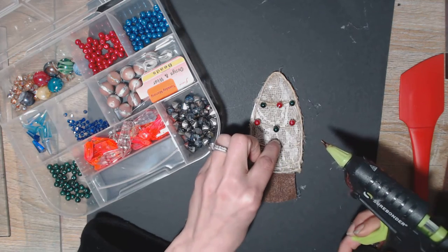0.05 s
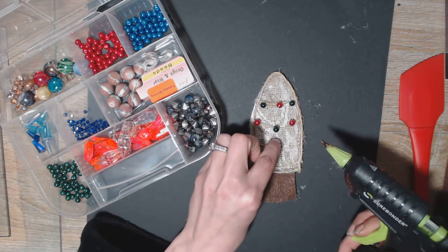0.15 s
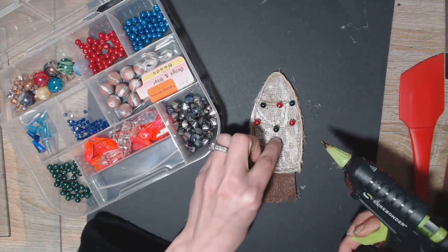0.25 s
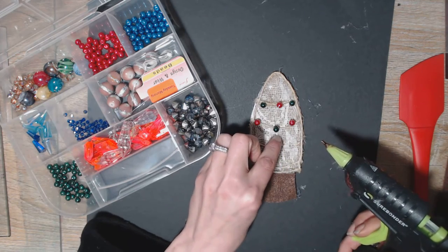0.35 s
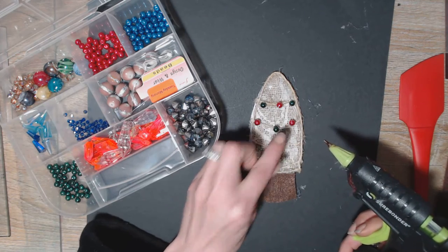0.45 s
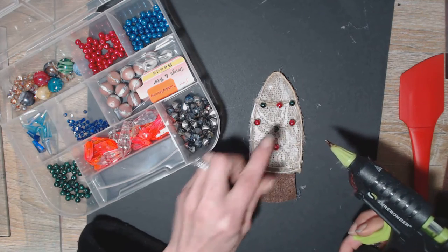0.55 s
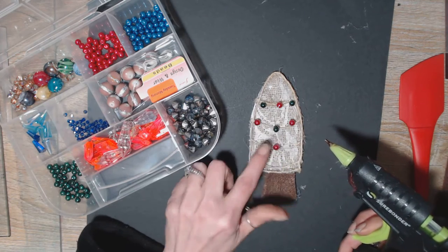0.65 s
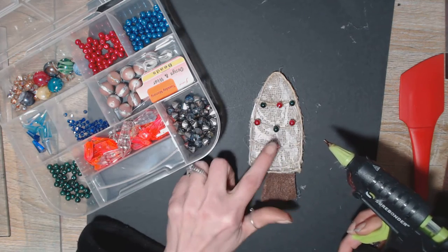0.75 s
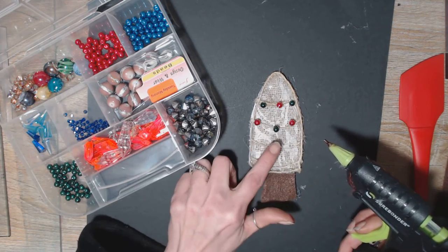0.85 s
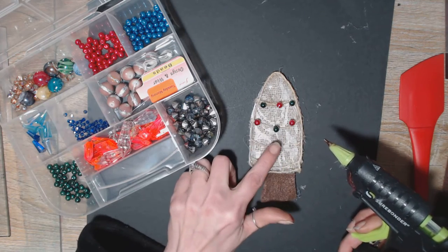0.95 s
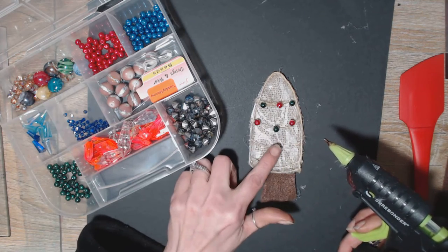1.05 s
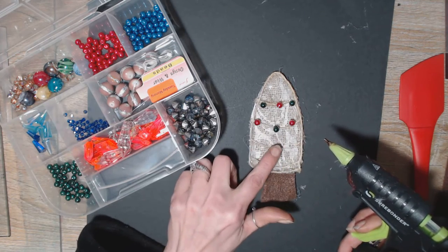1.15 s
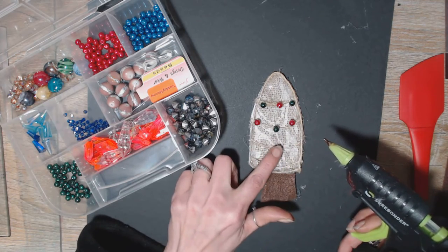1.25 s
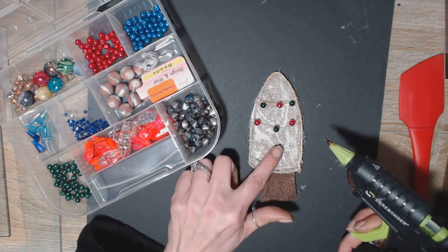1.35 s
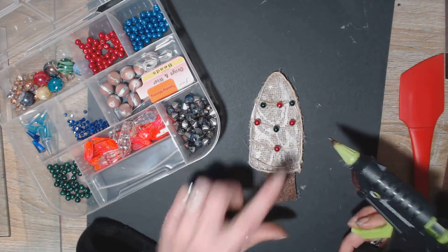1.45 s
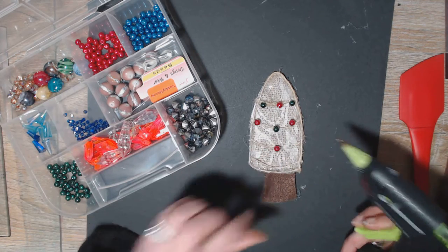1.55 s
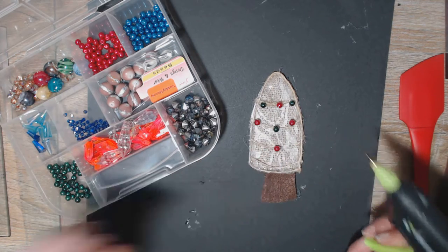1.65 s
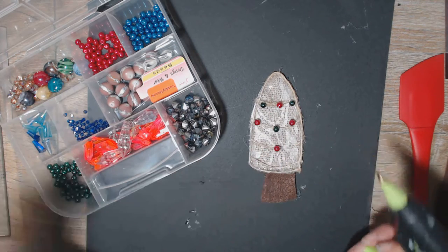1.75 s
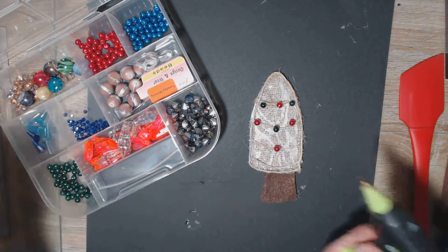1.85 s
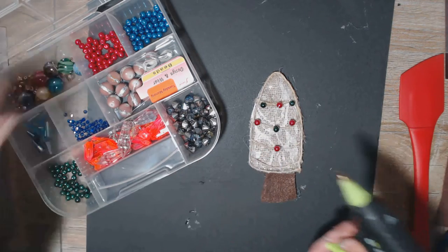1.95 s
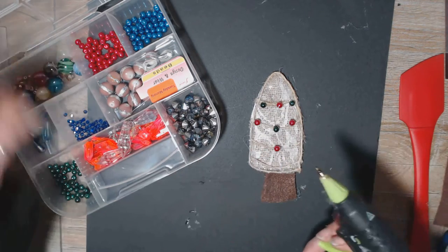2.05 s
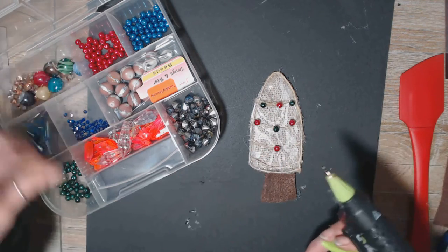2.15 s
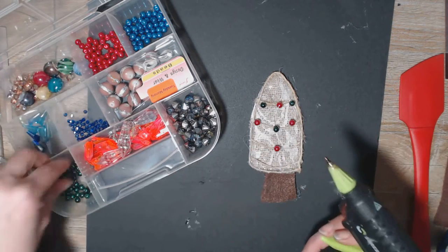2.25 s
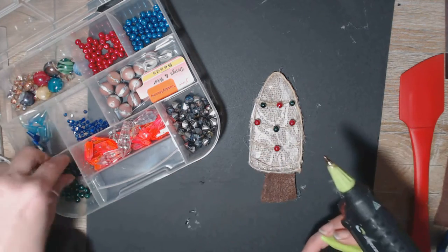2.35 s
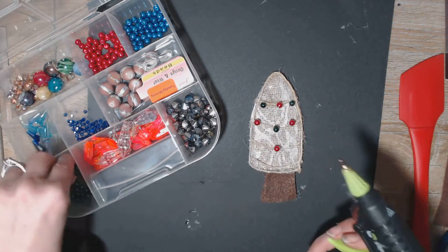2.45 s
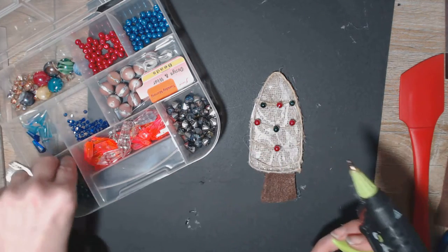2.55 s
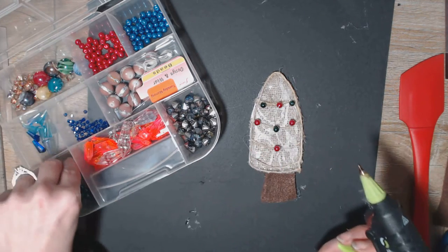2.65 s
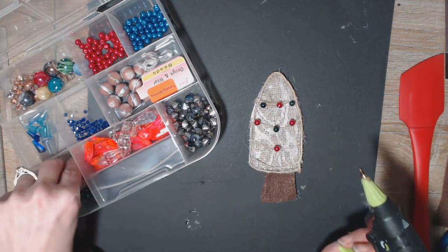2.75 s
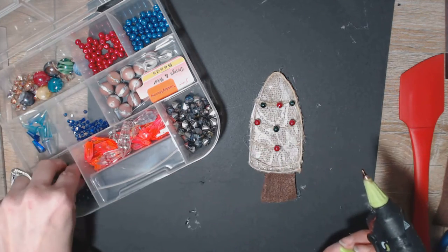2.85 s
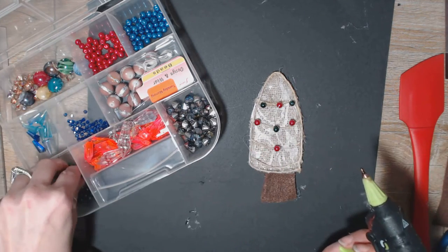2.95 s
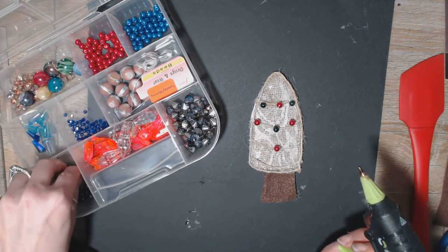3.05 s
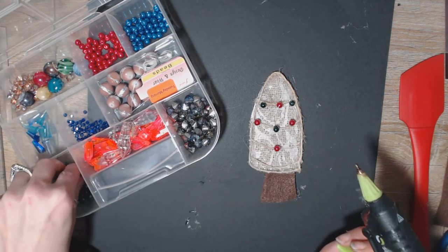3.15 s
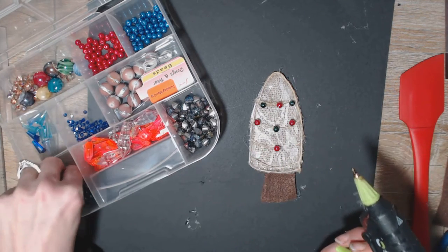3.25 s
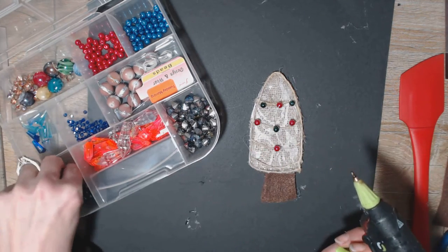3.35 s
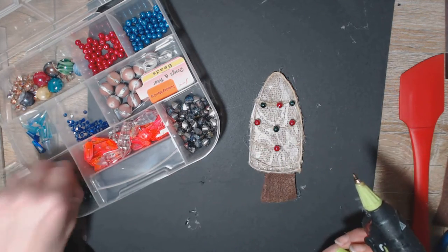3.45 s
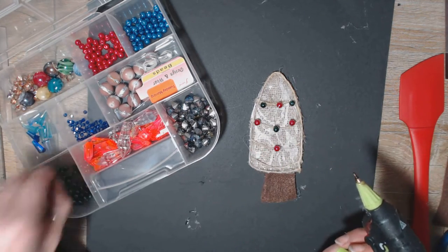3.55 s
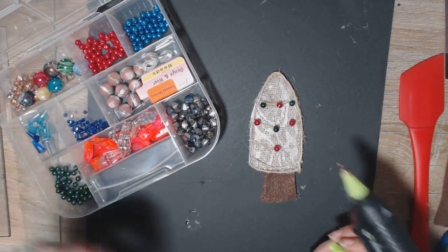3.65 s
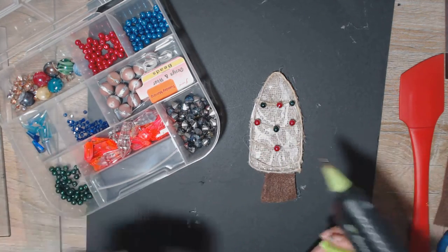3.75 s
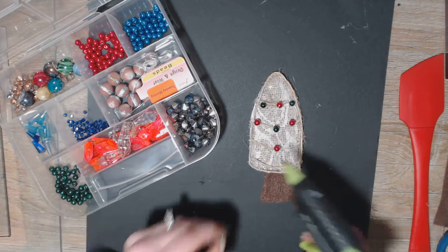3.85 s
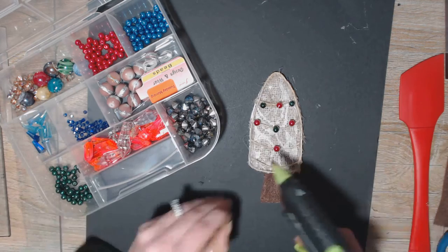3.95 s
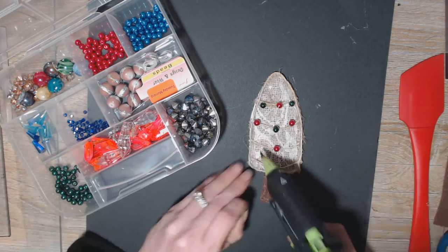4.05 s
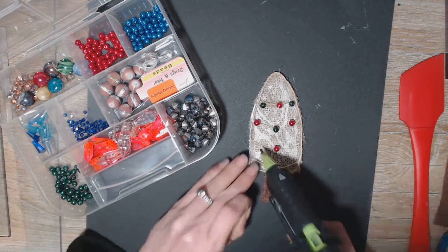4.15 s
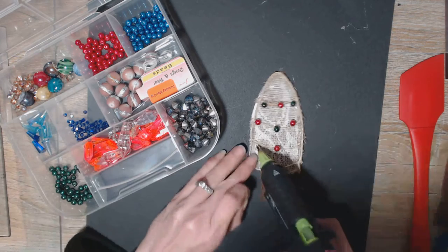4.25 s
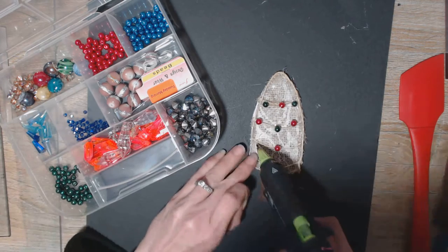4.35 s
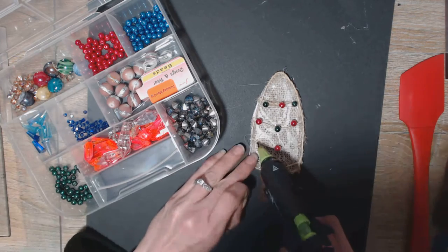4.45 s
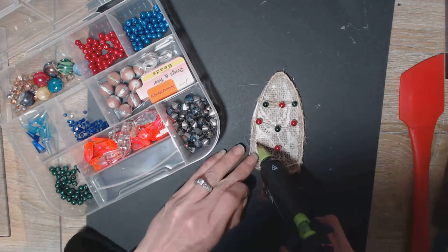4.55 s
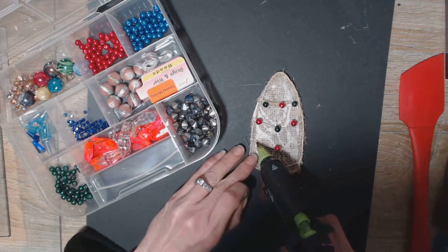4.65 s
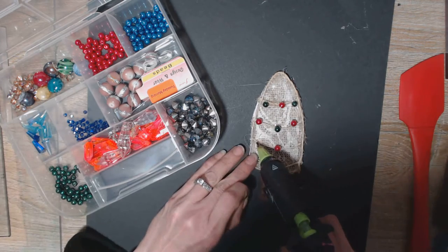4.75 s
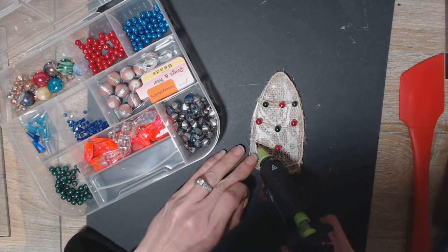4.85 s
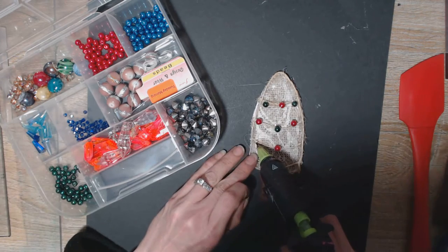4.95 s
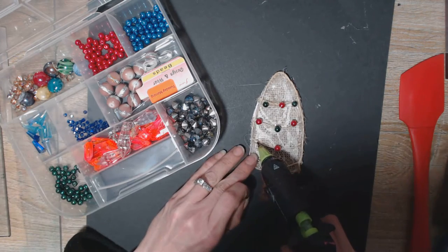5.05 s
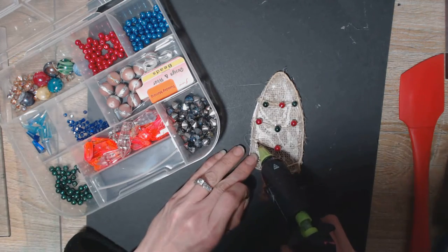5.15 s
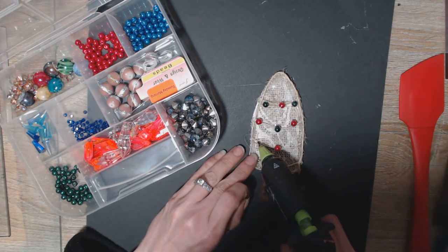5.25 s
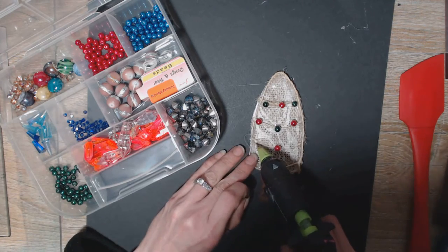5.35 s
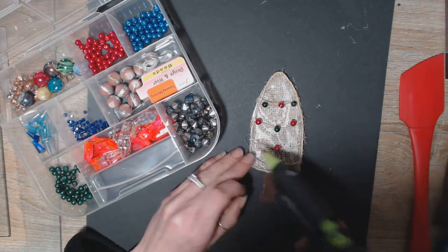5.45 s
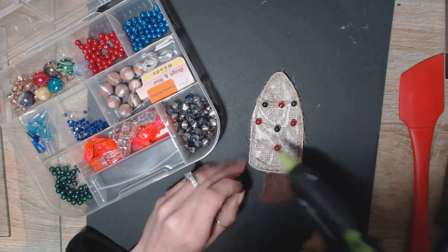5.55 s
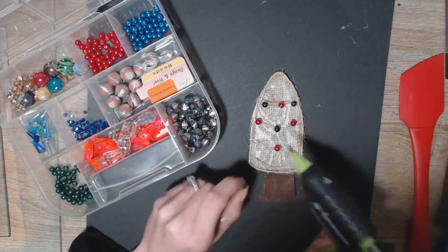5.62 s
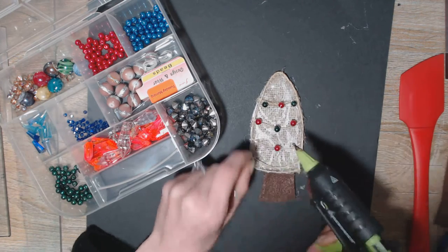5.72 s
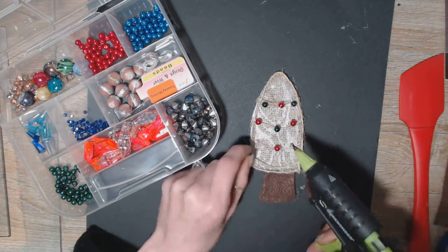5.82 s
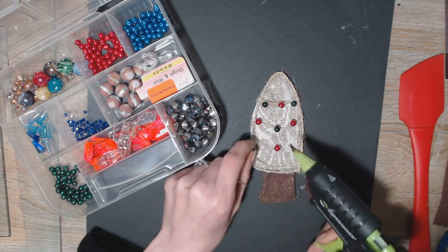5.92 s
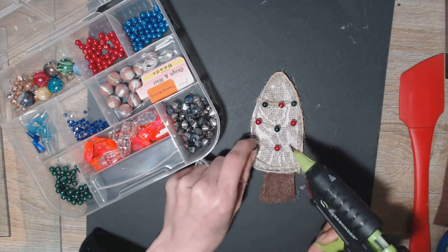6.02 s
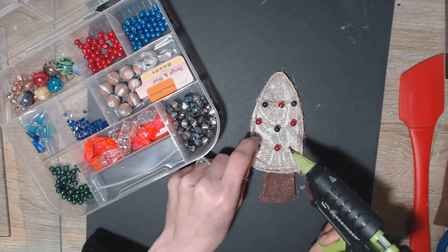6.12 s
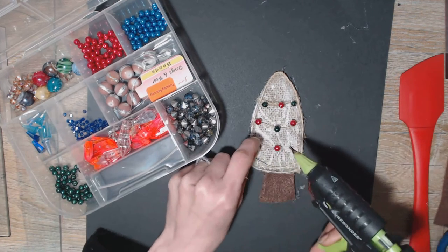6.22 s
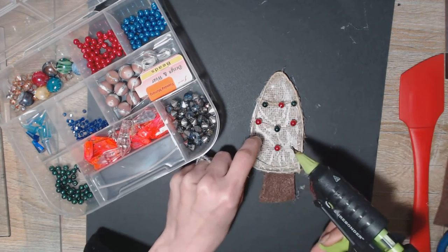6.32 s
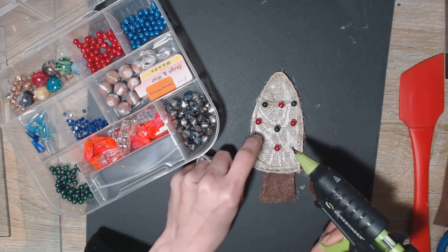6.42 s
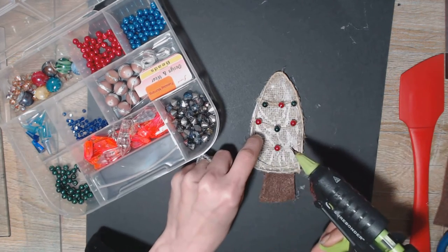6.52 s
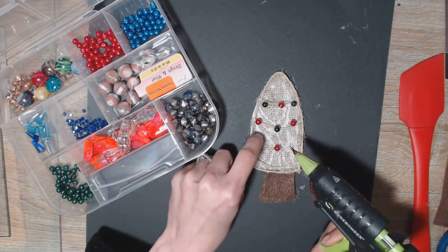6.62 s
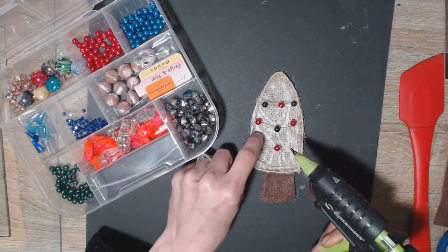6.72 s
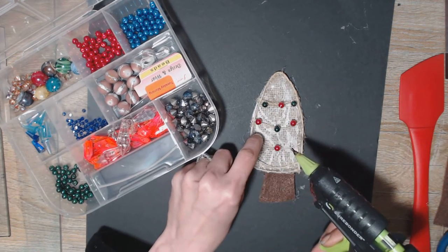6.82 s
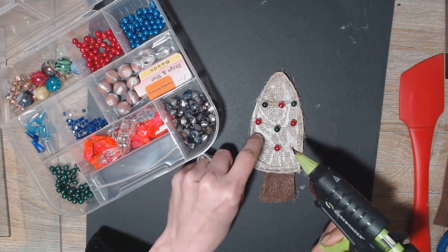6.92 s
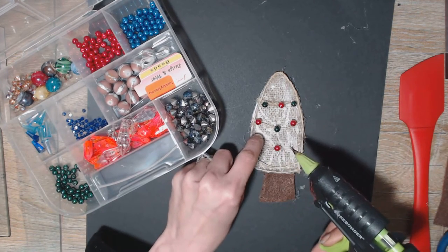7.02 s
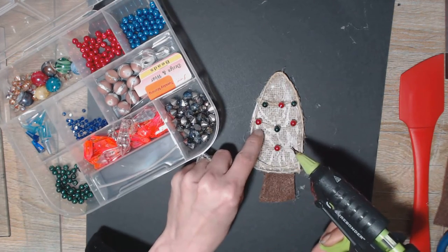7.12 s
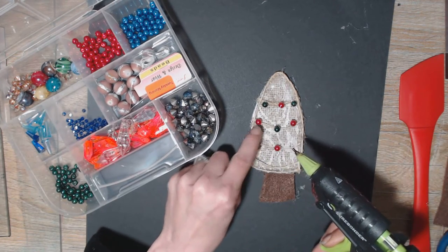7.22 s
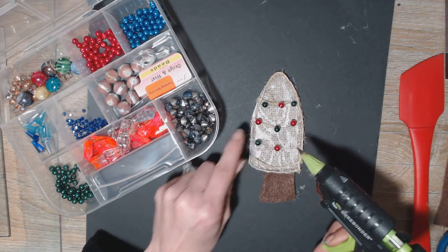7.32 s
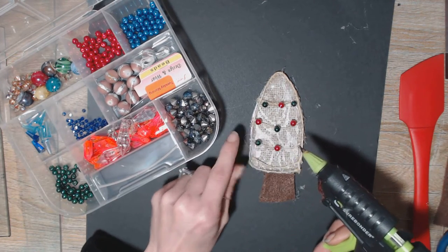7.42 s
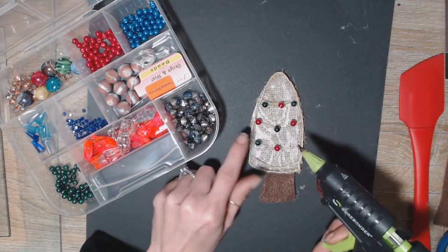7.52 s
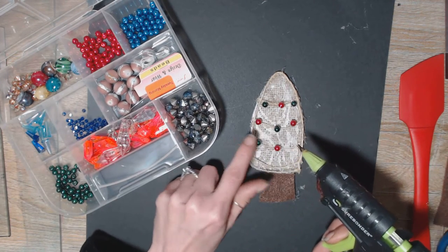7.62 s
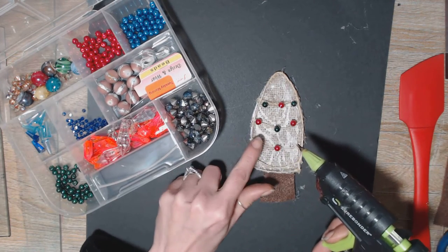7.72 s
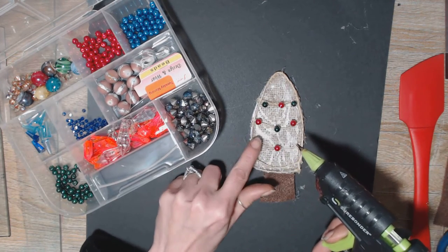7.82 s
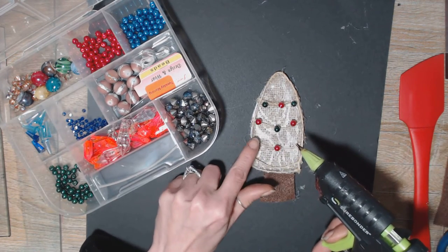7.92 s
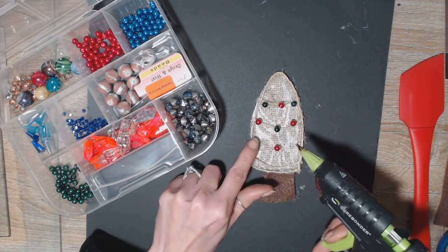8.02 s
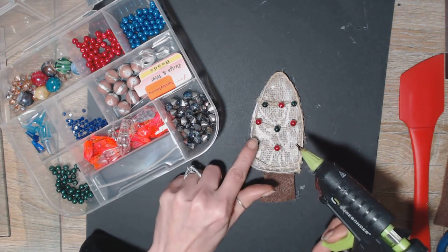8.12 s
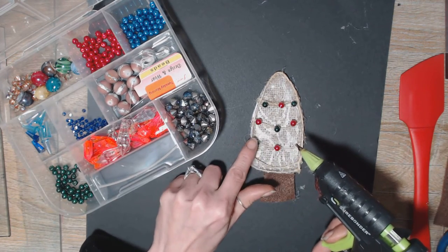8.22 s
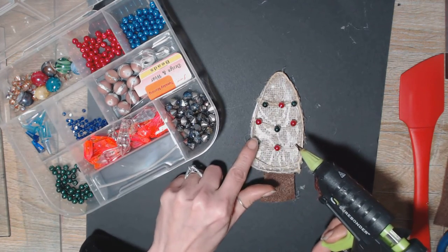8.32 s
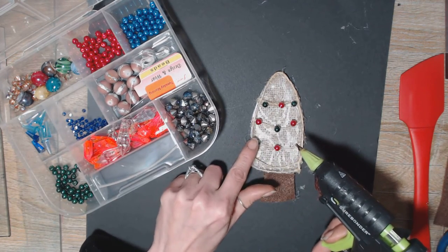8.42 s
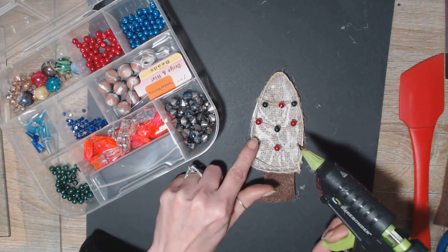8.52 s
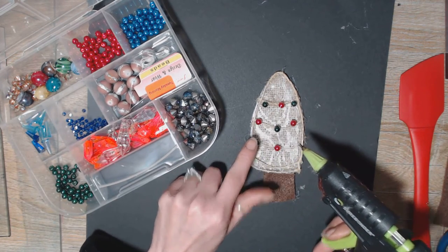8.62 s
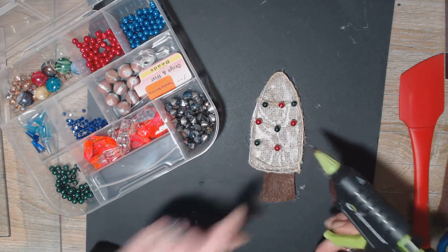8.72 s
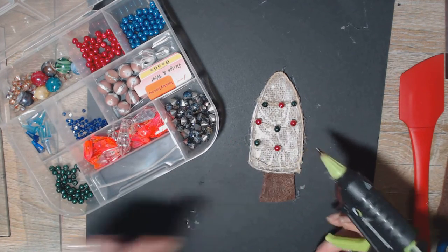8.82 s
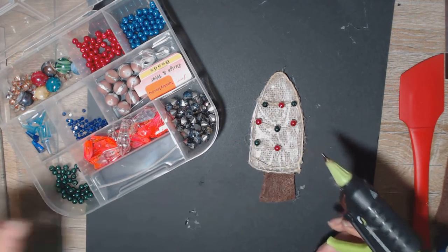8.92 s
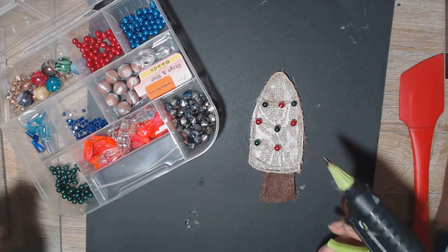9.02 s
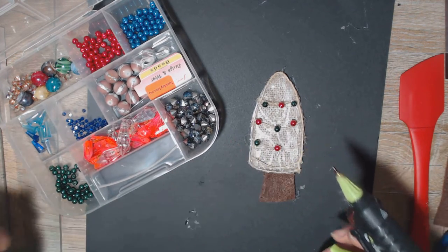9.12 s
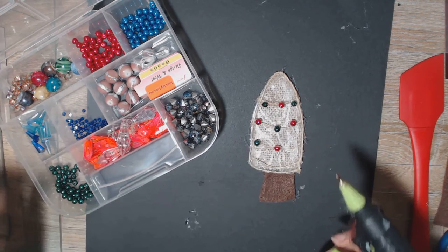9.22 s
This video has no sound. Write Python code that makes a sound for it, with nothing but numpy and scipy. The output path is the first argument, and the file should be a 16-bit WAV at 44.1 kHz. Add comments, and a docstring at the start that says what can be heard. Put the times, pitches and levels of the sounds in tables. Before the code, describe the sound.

A steady low mains hum fills a quiet room, with faint hiss and a tiny, rapid motor whine. Fingers tap a small craft piece once, then rummage in a plastic bead box for about a second with bright, dense rattling and clicks. Near silence follows, broken by a short scrape and tool click, and much later a light tick on the rim. Close, slightly dull microphone.

```python
"""A strong mains hum, a faint hiss and a camera motor stepping 15 times a second sound throughout.
Soon fingers tap the mat and the work; then they rummage for small beads in a plastic compartment box,
with later touches of the mat, a tool and the rim. Hum and whine are sums of sines, hiss is shaped noise;
taps are impulses with chatter and tail, rubs and rolling beads are random contacts, and both ring
the resonances of the box. Thuds and table knocks are damped sines. A narrow-band microphone hears all."""
import sys
import numpy as np
from scipy import signal
from scipy.fft import rfft, irfft, next_fast_len
from scipy.io import wavfile
from scipy.ndimage import uniform_filter1d

SR = 44100
rng = np.random.default_rng(int(sys.argv[2]) if len(sys.argv) > 2 else 0)


def materialize(psi):
    """Save the field psi as 16-bit PCM at rate SR to the path in sys.argv[1].

    A 1-D psi becomes a single channel; in a 2-D psi each row is a channel.
    """
    bounded = np.clip(np.atleast_2d(psi).T, -1, 1)
    quanta = np.round(bounded * 32767).astype(np.int16)
    wavfile.write(sys.argv[1], SR, quanta)


N = 408807

# resonances of the plastic box: f/Hz, width/Hz, level/dB
BOX_MODES = [(256.9, 61, -3), (630, 120, -11.5), (777.4, 40, -2.5), (783, 56, 1), (940.5, 120, -0.5),
             (1085, 110, -0.5), (1330, 300, -3.5), (1680, 120, -2.5), (1972, 170, -4.5), (2260, 65, -4.5),
             (2500, 270, -8), (3050, 140, -5.5), (3258, 150, -5.5), (3556, 180, -4), (3794, 420, -8),
             (4190, 240, -4.5), (4384, 250, -6.5), (4948, 380, -2.5), (5020, 200, 0), (5520, 420, -6),
             (5883, 550, -5), (6244, 360, -3.5), (6570, 460, -6.5), (6816, 250, -7.5), (7080, 1042, -9.5),
             (6940, 340, -4.5)]
# centres of the spectral parts thud, table, box floor, walls, dividers, beads: f/Hz
PART_HZ = [260, 700, 1100, 2200, 4200, 6400]


def amp(db):
    """Logarithmic level: dB to amplitude ratio."""
    return 10 ** (np.asarray(db) / 20)


def rms_one(x):
    """Power normalisation: scale to rms 1."""
    return x / np.sqrt(np.mean(x ** 2) + 1e-30)


def at_hz(points, hz):
    """Logarithmic frequency scale: interpolate a (f/Hz, value) table along log f."""
    table = np.array(points)
    return np.interp(np.log(hz), np.log(table[:, 0]), table[:, 1])


def band(x, low_hz, high_hz):
    """Band limitation by a Butterworth band-pass."""
    return signal.sosfilt(signal.butter(2, [low_hz, high_hz], "band", fs=SR, output="sos"), x)


def drift(rate):
    """Slow random modulation of rms 1: straight lines between `rate` random knots a second."""
    knots = rng.standard_normal(int(N / SR * rate) + 2)
    return rms_one(np.interp(np.arange(N) / SR * rate, np.arange(len(knots)), knots))


def grains(shape, per_s, spread_db):
    """Shot noise: random impulses of uneven size and sign, each standing for one contact."""
    sizes = amp(spread_db * np.minimum(rng.exponential(1, shape), 4))
    signs = rng.choice([-1, 1], shape)
    return sizes * signs * (rng.random(shape) < per_s / SR)


def box_modes(size):
    """Modal superposition: resonance curves at both microphone ports, array ports x modes x bins."""
    # level of left over right: f/Hz, balance/dB
    balance = [(60, -2.0), (100, -2.0), (180, -1.5), (300, -4), (520, -2.5), (880, 5), (1510, 2),
               (2580, -1.5), (4420, -1.5), (7570, 3)]
    # phase by which left leads right: f/Hz, phase/rad
    phase = [(260, 0.7), (700, 0.2077), (2200, .25), (5000, .2)]
    hz, width, level_db = np.transpose(BOX_MODES)[:, :, None]
    f = np.arange(size // 2 + 1) * SR / size
    resonance = 1j * width * f / (hz ** 2 - f ** 2 + 1j * width * f)
    polarity = (-1) ** np.arange(len(BOX_MODES))[:, None]
    ring = amp(level_db) * resonance * polarity
    # a small box radiates little bass; only its lowest mode, the thud, keeps it
    small = signal.butter(4, 600, "high", fs=SR, output="sos")
    ring[1:] *= signal.sosfreqz(small, f, fs=SR)[1]
    lean = amp(at_hz(balance, hz) / 2) * np.exp(.5j * at_hz(phase, hz))
    return np.array([ring * lean, ring / lean])


def friction(levels, per_s, clump_db):
    """Friction as dense random impacts ringing the box; each row of levels is one part's gain in time."""
    size = 8192
    contacts = grains(N, per_s, spread_db=1.5) * amp(clump_db * drift(90.0))   # contacts come in clumps
    response = irfft(box_modes(size)[:, 1:].sum(1), size)[:, :size // 2]   # without the thud mode
    body = signal.oaconvolve(contacts[None], response, axes=1)[:, :N]
    # bands in Hz of box floor, walls, dividers, beads and table
    parts_hz = [(600, 1200), (1200, 2600), (2600, 4000), (4000, 8000), (880, 980)]
    return sum(level * rms_one(band(band(body, *edges), *edges)) for level, edges in zip(levels, parts_hz))


def knocks(events, modes):
    """Damped free vibration: a soft contact swells the modes over a few milliseconds, then they decay."""
    t, out = np.arange(N) / SR, np.zeros(N)
    for s, event_db in events:
        i = round(s * SR)
        since = t[:min(SR // 2, N - i)]
        swell = 1 - np.exp(-since / 0.0036)
        for hz, mode_db, t60 in modes:
            decay = amp(event_db + mode_db - 60 * since / t60)
            out[i:i + len(since)] += swell * decay * np.sin(2 * np.pi * hz * since)
    return out


def hum():
    """Harmonic series: twice the mains frequency and two odd overtones, almost steady."""
    # partials of the hum: f/Hz, rms level/dB
    partials = [(120.055, -37.5), (360.165, -81.5), (600.275, -90.5)]
    balance_db = -1.9   # left over right
    t = np.arange(N) / SR
    tone = sum(np.sqrt(2) * amp(db) * np.sin(2 * np.pi * hz * t) for hz, db in partials)
    wander = amp(.25 * drift(1.6) + .25 * drift(12.0))
    return tone * wander * amp([[balance_db / 2], [-balance_db / 2]])


def hiss():
    """Partly coherent noise: coloured room and circuit noise, nearly alike in both channels."""
    # relative noise spectrum: f/Hz, density/dB per Hz
    spectrum = [(25, -9), (60, -5), (100, 2), (170, 5), (200, -2), (221, 6.5), (245, -10.5), (400, -16),
                (700, -23), (1200, -28.5), (2200, -31), (3200, -35.5), (4500, -37.5), (7000, -33),
                (8200, -39.5)]
    # left-right likeness of the noise: f/Hz, correlation (no unit)
    likeness = [(60, 1), (240, .9), (480, 1), (1900, .93), (3800, 0.57), (7500, 0.98)]
    rms_db = -65.5
    size = next_fast_len(N)
    hz = np.maximum(np.arange(size // 2 + 1) * SR / size, 1)
    mid, side = rfft(rng.standard_normal((2, size))) * amp(at_hz(spectrum, hz))
    alike = np.clip(at_hz(likeness, hz), 0, 1)
    both = np.sqrt(1 + alike) * mid + np.sqrt(1 - alike) * side * [[1], [-1]]
    return amp(rms_db) * rms_one(irfft(both, size)[:, :N])


def motor():
    """Periodic excitation: each step whines, swelling on the third harmonic, and ends in a soft clack."""
    # reference level of the whine, before each step's swell: t/s, level/dB
    whine_levels = [(0, -74.5), (.4, -66), (.8, -71), (2.35, -69.5), (3.6, -83), (4.05, -82), (4.5, -68.5),
                    (4.8, -80.5), (5.4, -74), (5.8, -79), (7.04, -77), (7.1, -66), (7.17, -73),
                    (7.7, -71.5), (8.05, -75.5), (9.27, -72.5)]
    step_s, first_step_s, whine_hz = 1 / 15, .012, 2276
    sag, sag_s = .03, .012   # each whine starts sharp by this share and settles with this time constant
    lower_follows, clack_follows = 0.17, .3   # shares of the whine's dB swing
    fade_db_per_s = 200   # decay of the lower tones within a step
    clack_db = -83.5   # at a whine of -74 dB, before each step's puff
    t = np.arange(N) / SR
    whine_db = np.interp(t, *np.transpose(whine_levels))
    since = (t - first_step_s) % step_s
    step = ((t - first_step_s) // step_s).astype(int) + 1
    luck = rng.normal(0, 1, (step[-1] + 1, 3))[step].T   # each step differs a little in level

    sharp = sag * np.cumsum(np.exp(-since / sag_s)) / SR
    turn = 2 * np.pi * whine_hz * (t + sharp) + .4 * drift(60.0)   # the pitch wavers a little
    swell_s = [0, .008, .015, .023, .028, .031, .045, .055]
    swell_db = np.interp(since, swell_s, [-23.5, -16.5, -9, 2.5, 1.5, -11, -20.5, -32.0])
    third = amp(whine_db + swell_db + 1.3 * luck[0]) * np.sin(3 * turn)

    driven = uniform_filter1d((since < .028) * 1., size=80)   # on for 28 ms, with softened edges
    lower_gain = amp(lower_follows * (whine_db + 75.5) - fade_db_per_s * (since - 0.0289))
    second = amp(-92.5 + 1.1 * luck[1]) * np.sin(2 * turn)
    first = amp(-94.5) * np.sin(turn)
    lower = driven * lower_gain * (second + first)

    puff_db = np.interp(since, [.012, .022, .03, .04, .048], [-22, -7, 2, -3, -22])
    bright = rms_one(band(rng.standard_normal(N), 5100, 8400))
    clack = amp(clack_db + clack_follows * (whine_db + 74) + puff_db + 1.2 * luck[2]) * bright
    return third + lower + clack


def taps(size=8192, tail_t60=.095):
    """Impact excitation: a blow, a short chatter of bounces and a softer tail, coloured by where it lands."""
    # taps of beads, nails and ring: t/s, peak level/dB before panning, where, favoured ring f/Hz,
    # brightness/dB per octave, rattling tail level/dB
    tap_list = [(0.328, -65, "mat", 594, -3, -15), (0.531, -27.5, "work", 1075, 2, -23),
                (0.543, -40, "work", 813, -9, -21), (0.562, -32.5, "work", 1050, 1.5, -28),
                (0.571, -41.5, "work", 850, -1, -26), (0.58, -45, "work", 1000, -0.5, -32),
                (0.606, -61, "work", 980, -9.5, -16), (2.144, -16, "wall", 1860, -0.5, -23.5),
                (2.164, -26, "heap", 2460, -5, -32), (2.212, -46.5, "rim", 608, -3, -23),
                (2.232, -56.5, "mat", 605, 4, -14.5), (2.466, -10.5, "wall", 3990, 3.5, -29),
                (2.631, -14, "wall", 1105, -2.5, -30), (2.636, -18, "heap", 4030, 1.5, -17),
                (2.644, -16, "heap", 4920, -2, -20.5), (2.654, -18, "heap", 5050, -2, -24),
                (2.664, -15, "heap", 4980, 1.5, -17), (2.665, -19.5, "heap", 1680, -4, -19.5),
                (2.674, -16.5, "heap", 4360, 7.5, -21.5), (2.682, -17, "heap", 4300, 0, -24),
                (2.701, -13, "heap", 4260, 1, -20), (2.706, -20, "heap", 4080, 0.5, -25.5),
                (2.722, -34, "heap", 4950, -1, -26.5), (2.735, -36, "floor", 1610, 0.5, -13.5),
                (2.767, -24.5, "floor", 1310, -1, -18), (2.798, -33.5, "floor", 1640, 1, -11),
                (2.807, -22, "heap", 5020, 2.5, -15), (2.811, -22.5, "heap", 1710, -0.5, -10.5),
                (2.826, -18.5, "floor", 4900, -0.5, -33.5), (2.834, -29, "heap", 2460, -1.5, -44),
                (2.88, -31.5, "heap", 5000, 8, -15), (2.895, -24.5, "heap", 4220, -0.5, -17),
                (2.912, -26.5, "heap", 1660, 0, -20), (2.929, -33, "floor", 1110, -0.5, -22.5),
                (2.961, -36, "rim", 1220, -6.5, -30.5), (3, -15, "rim", 1880, 0, -21.5),
                (3.021, -21, "floor", 3420, 0, -29.5), (3.028, -20.5, "heap", 4800, -3, -24),
                (3.059, -25.5, "heap", 4930, 6.5, -21.5), (3.071, -25.5, "floor", 1340, -1, -14),
                (3.087, -21.5, "floor", 1280, 0, -23), (3.098, -21.5, "heap", 1130, -4.5, -19.5),
                (3.118, -15.5, "heap", 6000, 2, -21), (3.129, -17.5, "heap", 1940, -0.5, -22),
                (3.134, -18.5, "heap", 2100, -4, -5.5), (3.14, -17.5, "heap", 5100, 0.5, -26),
                (3.16, -14, "heap", 5320, 1.5, -21), (3.175, -23.5, "floor", 1700, 3, -26.5),
                (3.194, -32.5, "floor", 1650, -0.5, -26.5), (3.226, -40.5, "heap", 3150, -9, -20),
                (3.276, -22.5, "rim", 3350, 0, -22), (3.323, -27, "heap", 3290, 1, -14),
                (3.342, -16, "rim", 2900, -2.5, -24), (3.358, -18, "rim", 2820, -1, -29.5),
                (3.369, -25, "rim", 3700, 0, -22.5), (3.378, -21.5, "rim", 3684, 1.5, -19.5),
                (3.389, -31, "rim", 3270, -3.5, -14), (3.411, -15.5, "rim", 3030, -2, -28),
                (3.433, -16.5, "rim", 3000, 2, -20.5), (3.445, -20.5, "rim", 3850, 2, -20.5),
                (3.459, -25.5, "rim", 4170, 8, -38), (3.478, -43.5, "hand", 3950, 1, -18),
                (3.54, -35, "hand", 4100, -1, -25.5), (3.589, -43.5, "hand", 4110, -3.5, -17),
                (3.614, -35.5, "hand", 4140, 2.5, -22), (3.619, -33, "hand", 4080, -0.5, -21.5),
                (3.643, -42, "hand", 4220, -3.5, -27), (3.81, -63.5, "mat", 623, 3.5, -14),
                (3.86, -64, "mat", 842, -5.5, -13.5), (5.654, -34.5, "tool", 1700, -2.5, -17.5),
                (5.669, -19.5, "tool", 766, -2, -30), (5.68, -32, "tool", 1245, -3.5, -30.5),
                (8.549, -27, "rim", 4900, -2, -25), (8.602, -54.5, "rim", 600, 0, -12),
                (8.614, -55, "rim", 610, -1.5, -17), (8.677, -67, "mat", 2303, -1, -11)]
    # colour by landing place: level/dB in thud, table, box floor, walls, dividers, beads
    spots = {"mat": (-9.5, -19, -12, -16, -12.5, -17.5), "work": (-12, -3.5, -10.5, -8, -31.5, -27.5),
             "floor": (-36.5, -27, -10, -12.5, -9.5, -9.5), "heap": (-40.5, -27, -21, -16, -13.5, -15),
             "rim": (-38, -44.5, -27, -14, -12, -15), "wall": (-43, -20.5, -12, -13.5, -16.5, -29.5),
             "tool": (-37, -9, -16.5, -8, -17, -18.5), "hand": (-22.5, -31.5, -41.5, -37, -10, -22)}
    held, chatter_t60 = .001, .011   # s
    delay_s = .001   # short delay of the blow, as the colour builds up ahead of it
    pan_spread_db = 1
    lead = 256   # samples left for the colour to build up ahead of the blow
    out, modes, t = np.zeros((2, N + size)), box_modes(size), np.arange(size // 2) / SR
    hz = np.maximum(np.arange(size // 2 + 1) * SR / size, 1)
    dying = np.maximum(t - held, 0)
    octaves = np.log2(np.maximum(PART_HZ, 700) / 2200)
    for s, peak_db, where, ring_hz, bright_db, tail_db in tap_list:
        chatter = rms_one(grains(len(t), per_s=5200.0, spread_db=5.5)) * amp(-60 * dying / chatter_t60)
        tail = signal.lfilter([1], [1, -0.43], rng.standard_normal(len(t)))   # duller than the blow
        blow = 0.19 * chatter + tail * amp(tail_db - 60 * dying / tail_t60)
        blow[0] += 2.8

        ring_db = 7.8 * np.exp(-(np.log(hz / ring_hz) / 0.1245) ** 2)
        parts_db = spots[where] + bright_db * octaves
        colour = amp(at_hz(list(zip(PART_HZ, parts_db)), hz) + ring_db)
        # every tap excites the modes unevenly, slightly differently at each port
        common_db = rng.normal(0, 2.2, len(BOX_MODES))
        port_db = 0.85 * rng.standard_normal((2, len(BOX_MODES)))
        body = np.einsum("pm,pmb->pb", amp(common_db + port_db), modes)

        sound = np.roll(irfft(rfft(blow, size) * body * colour, size), lead, axis=1)
        pan_db = pan_spread_db * rng.standard_normal()
        sound *= amp(peak_db) / np.abs(sound.mean(0)).max() * amp([[pan_db / 2], [-pan_db / 2]])
        i = round((s + delay_s) * SR) - lead
        out[:, i:i + size] += sound
    return out[:, :N]


def rubs():
    """Sliding friction: each slide of a hand or tool swells, holds and fades."""
    # slides: start t/s, rise t/s, hold t/s, fall t/s,
    # level/dB in box floor, walls, dividers, beads, table
    slides = [(0.473, 0.04, 0.01, .012, -72, -64.5, -71.5, -72, -80),
              (1.603, 0.043, 0.2, 0.11, -85.5, -89, -74, -65, -95.5),
              (2.504, .06, 0.079, .004, -85, -55.5, -57, -65.5, -99),
              (3.496, 0.028, 0.044, .03, -79, -80, -76, -71, -99),
              (5.429, 0.047, 0.036, 0.034, -49, -53, -51, -55, -46.5),
              (5.615, .035, 0, 0.0097, -75, -61, -80, -79.5, -78)]
    swell_db = 33.5   # from the ends of a slide up to its hold
    t, levels = np.arange(N) / SR, np.zeros((5, N))
    for s, rise, hold, fall, *parts_db in slides:
        corners = s + np.cumsum([0, rise, hold, fall])
        stroke = amp(np.interp(t, corners, [-swell_db, 0, 0, -swell_db], -200, -200))
        levels += amp(parts_db)[:, None] * stroke
    return friction(levels, per_s=3900.0, clump_db=2.0)


def thuds():
    """Low-frequency modes: the box knocks on the table, louder on the right."""
    # knocks of the box: t/s, level/dB before mode level and panning
    events = [(0.533, -47), (0.565, -51), (2.16, -59.5), (2.464, -50), (2.631, -49), (2.662, -39),
              (2.682, -37.5), (3.02, -47), (3.096, -66), (3.342, -55)]
    # modes of the thud: f/Hz, level/dB, t60/s
    modes = [(205, 2.5, .05), (269, -0.5, 0.07)]
    return knocks(events, modes) * amp([[-2.5], [2.5]])


def table_knocks():
    """Modes of a struck plate: a hand knocks softly on the table."""
    # knocks of the hand: t/s, level/dB before mode level
    events = [(1.765, -63.5), (4.175, -58), (8.504, -64)]
    # modes of the table: f/Hz, level/dB, t60/s
    modes = [(934, 5.5, 0.082), (1190, -4.5, 0.044), (3020, -6, .025)]
    return knocks(events, modes)


def rolls():
    """Rolling as clumped random impacts: lumpier contacts under the taps while the fingers stir the heap."""
    # beads rolling under the fingers: t/s, level/dB before colour, brightness/dB per octave
    course = [(2.64, -51.5, -0.5), (2.72, -47.5, 0), (2.822, -43.5, 1), (2.85, -57, -1),
              (2.89, -47.5, -1.5), (2.935, -49, 3), (2.95, -59.5, -3), (2.99, -61, -2), (3.08, -48, 0.5),
              (3.126, -48.5, 0.5), (3.248, -59, 3), (3.382, -56, -5.5), (3.442, -62, 15), (3.5, -90, -2)]
    # colour of the rolling: level/dB in box floor, walls, dividers, beads
    colour_db = [-9, 0.5, -5, -4.5]
    t = np.arange(N) / SR
    s, db, bright_db = np.transpose(course)
    octaves = np.log2(np.array(PART_HZ[2:]) / 2200)[:, None]
    level_db = np.interp(t, s, db, -200, -200) + octaves * np.interp(t, s, bright_db)
    return friction(amp(level_db + np.array(colour_db)[:, None]), per_s=2530.0, clump_db=4.0)


def scene():
    """Linear superposition of the steady sounds and the contacts."""
    steady = hum() + hiss() + motor()
    contacts = taps() + rubs() + thuds() + table_knocks() + rolls()
    return steady + contacts


def record(dry):
    """Band-limited transmission: a soft treble shoulder, faint converter noise and a steep cut."""
    self_noise_db, cutoff_hz = -101, 8300   # noise rms before the cut; edge of the stop band
    soft = signal.sosfilt(signal.butter(5, 7500, fs=SR, output="sos"), dry)
    noisy = soft + amp(self_noise_db) * rng.standard_normal(dry.shape)
    return signal.sosfilt(signal.cheby2(18, 55, cutoff_hz, fs=SR, output="sos"), noisy)


dry = scene()
out = record(dry)
materialize(out)
```